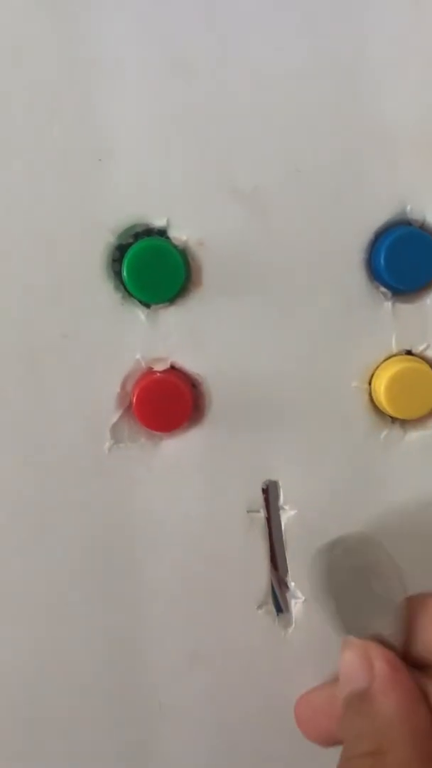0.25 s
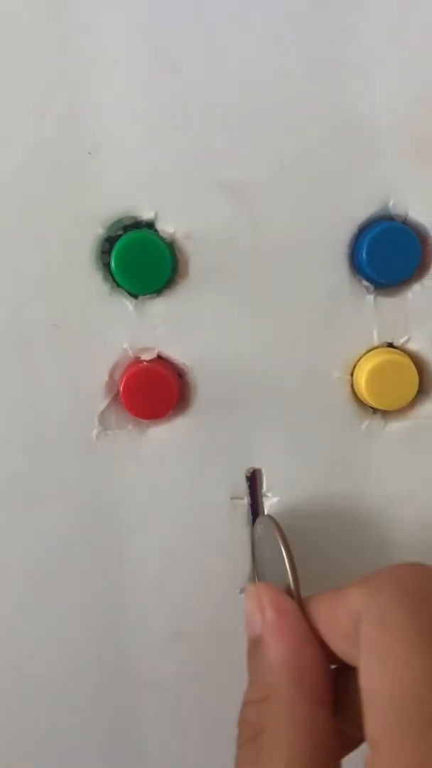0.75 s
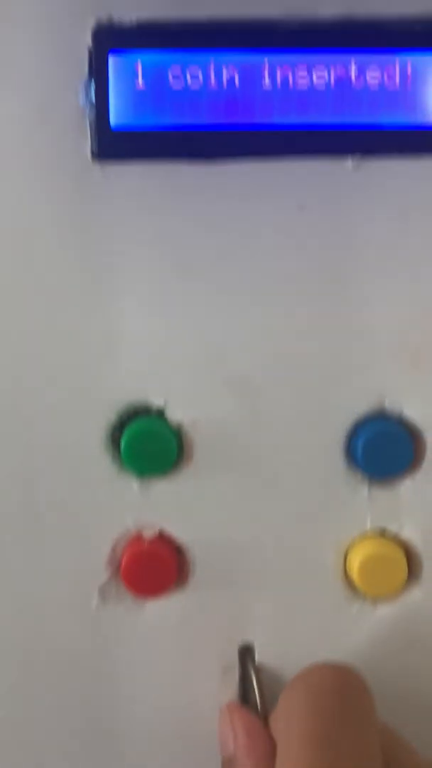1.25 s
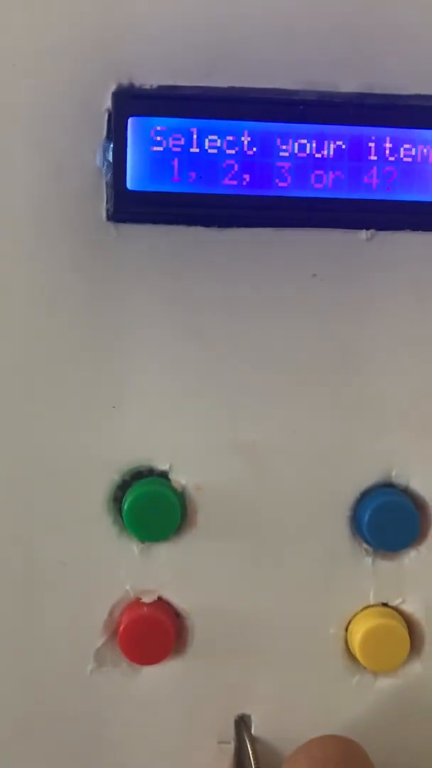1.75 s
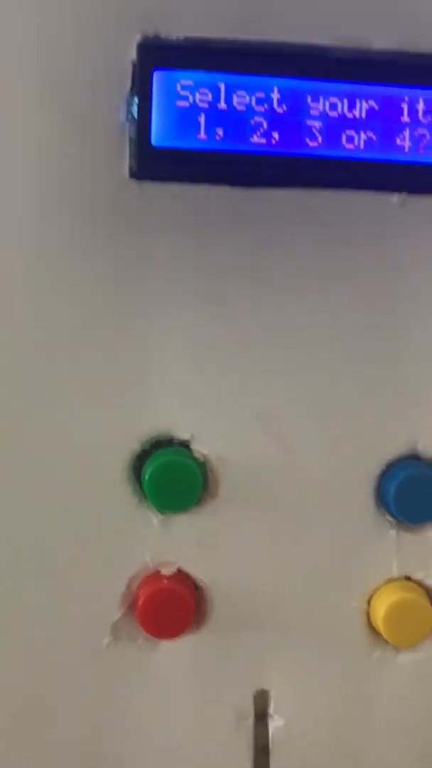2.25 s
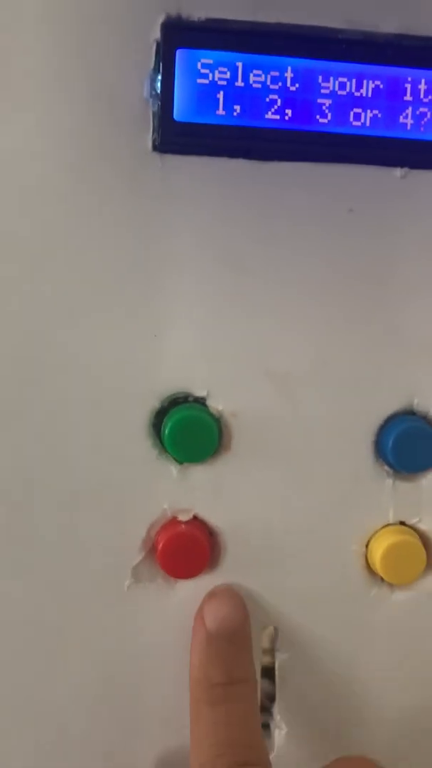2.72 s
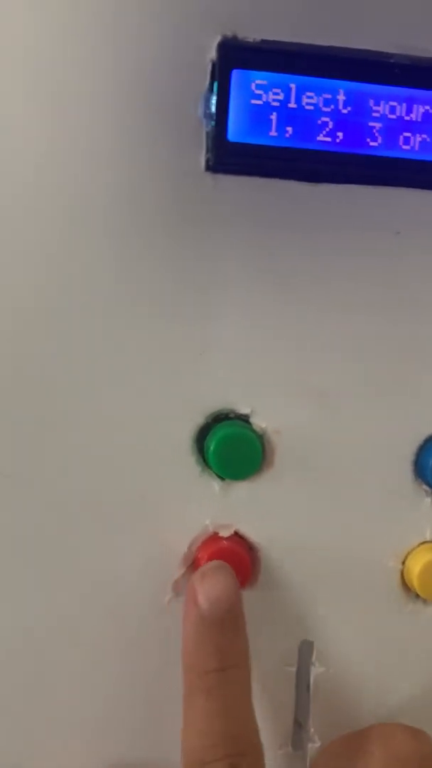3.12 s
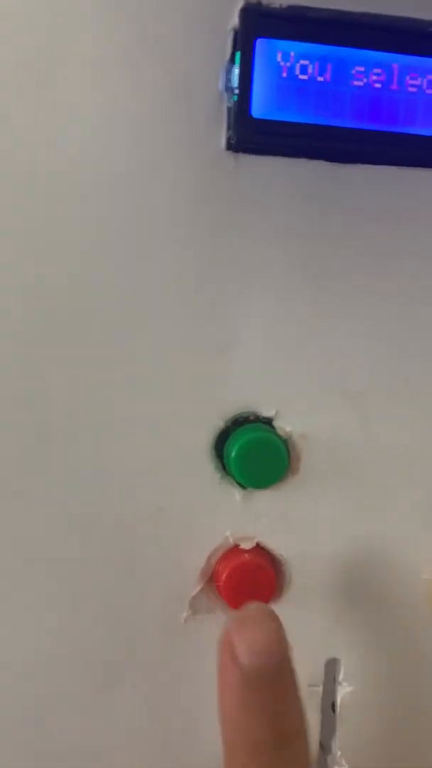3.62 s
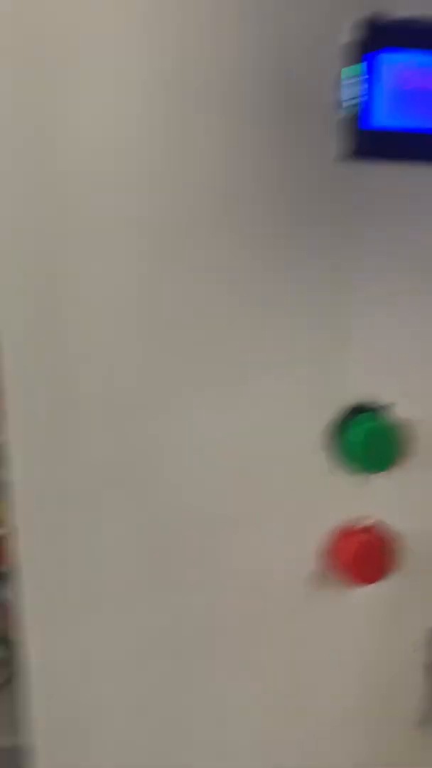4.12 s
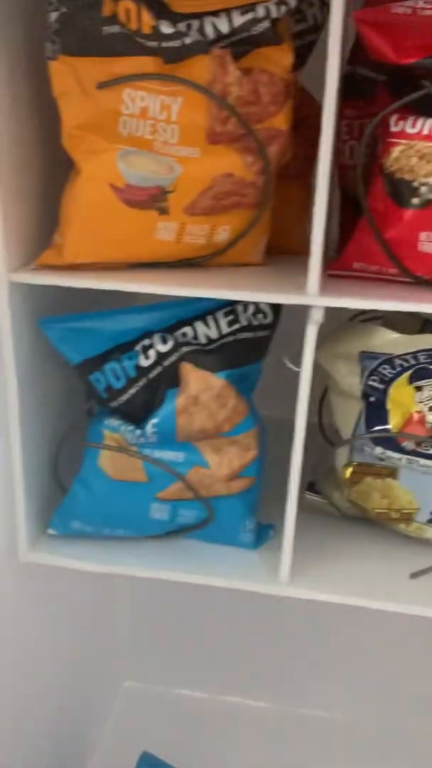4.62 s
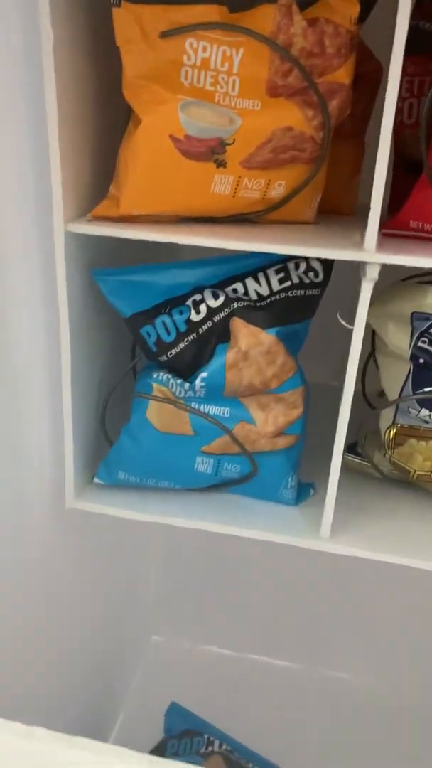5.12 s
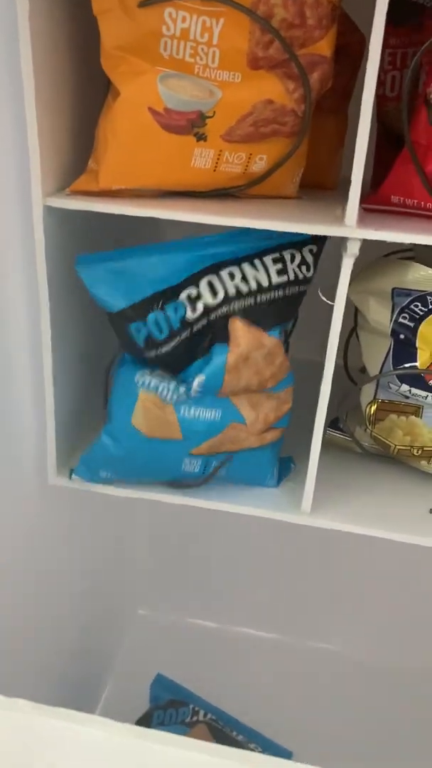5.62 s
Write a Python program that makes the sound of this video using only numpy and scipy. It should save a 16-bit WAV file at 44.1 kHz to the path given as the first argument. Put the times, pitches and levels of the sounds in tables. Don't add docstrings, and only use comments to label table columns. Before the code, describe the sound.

In a quiet room, a metal coin knocks and scrapes into a slot in a thin hollow board, ending with a bright rasp. Faint finger touches follow, then a sharp plastic button snap and a duller release knock. After a near-silent pause, a small geared motor whines in surges, rattling the cabinet while a foil snack bag cracks loudly. Close handheld stereo microphone, low room rumble.

```python
import sys
import numpy as np
from scipy import signal
from scipy.fft import rfft, irfft, next_fast_len
from scipy.io import wavfile
from scipy.ndimage import uniform_filter1d

SR = 44100
rng = np.random.default_rng(int(sys.argv[2]) if len(sys.argv) > 2 else 0)


def undo_db(level):
    steps = np.asarray(level, float) / 20
    return 10 ** steps


def wav_out(sig):
    wavfile.write(sys.argv[1], SR, np.round(np.clip(np.atleast_2d(sig).T, -1, 1) * 32767).astype(np.int16))


N = 258602


def evened(x):
    return x / np.sqrt(np.mean(x ** 2) + 1e-20)


def read(points, hz):
    f, value = np.transpose(points)
    return np.interp(np.log(hz + 1), np.log(f + 1), value)


def add(mix, s, sound):
    part = mix[round(s * SR):][:len(sound)]
    part += sound[:len(part)]


def shaped(x, gain):
    size = next_fast_len(len(x) + 4096)
    return irfft(rfft(x, size) * gain(np.fft.rfftfreq(size, 1 / SR)), size)[:len(x)]


def resonate(x, hz, width):
    turn = np.exp(2j * np.pi * np.cumsum(hz * np.ones(len(x))) / SR)
    r = np.exp(-np.pi * width / SR)
    return 2 * (turn * signal.lfilter([1 - r], [1, -r], x / turn + 1e-18)).real


def through(x, peaks):
    return evened(sum(undo_db(db) * resonate(resonate(x, hz, width), hz, width) for hz, width, db in peaks))


def unfold(rows):
    s, *columns = np.transpose(rows)
    t = np.arange(s[0], s[-1], 1 / SR)
    return s[0], [np.interp(t, s, column) for column in columns]


def humps(rows):
    t, rise_share = np.arange(N) / SR, 0.33
    return sum(undo_db(db - 20 * np.maximum(t - s, (s - t) / rise_share) / fade_s) for s, db, fade_s in rows)


def grit(count, per_s, spread_db):
    size = undo_db(spread_db * np.minimum(rng.exponential(1, count), 5)) * rng.standard_normal(count)
    return size * (rng.random(count) < per_s / SR)


def ring(modes, t, stretch, soft_s, tilt_db=0):
    luck = rng.random((len(modes), 2))
    x = np.zeros(len(t))
    for k, ((hz, db, t60), (weight, tuning)) in enumerate(zip(modes, luck)):
        level_db = db + 5 * weight + tilt_db * np.log2(hz / 1000)
        tone = np.sin(2 * np.pi * hz * (.98 + .04 * tuning) * t) * (-1) ** k
        x = x + undo_db(level_db - 60 * t / (t60 * stretch)) * tone
    x = x * (1 - np.exp(-t / soft_s))
    return x / abs(x).max()


# centre_hz, width_hz, level_db
SLOT = [(920, 510, 2), (1209, 100, 6), (1533, 470, 5.5), (2900, 1000, -4), (3675, 860, -5)]
# centre_hz, width_hz, level_db
COIN = [(5497, 1200, 1.5), (6300, 1124, 7), (8300, 1990, 2)]
# centre_hz, width_hz, level_db
RIM = [(11020, 9000, -8), (14200, 9000, 15)]
# start_s, length_s, first_pressure_db, last_pressure_db, grittiness_db
COIN_STROKES = [(.045, 0.067, -75, -81, -4), (.75, 0.052, -60.5, -54.5, -18), (.81, 0.054, -68, -59, -5),
                (.864, 0.054, -56, -49, 1), (.92, 0.096, -50.5, -63.5, -3.5), (1.02, 0.13, -63, -69, -12),
                (1.16, 0.13, -71.5, -65.5, -16.5), (1.836, .05, -61, -48, -4),
                (1.886, 0.048, -41.5, -34.5, -4.5), (1.95, 0.16, -55.5, -80, -30),
                (2.24, 0.0588, -87.5, -84, 5), (2.29, 0.11, -77, -84.5, 3), (2.728, .03, -65, -85, -8),
                (3.15, 0.024, -71, -78, -2.5)]
# start_s, length_s, first_pressure_db, last_pressure_db, grittiness_db
FINGER_STROKES = [
    (.455, 0.02, -72, -61, -13),
    (.59, 0.078, -64, -82.5, -20.5),
    (2.64, 0.01401, -66, -86, -25),
    (3.2, 0.063, -85, -67.5, -15),
    (3.29, 0.1, -47, -66.5, -24),
    (3.43, 0.0424, -56, -80, -24.5),
    (3.49, 0.038, -70.5, -64.5, 1.5),
]
# peak_s, level_db, fade_20db_s
LEANS = [(.08, -51, 0.23), (.42, -54, 0.15), (.8, -52.5, 0.08), (.91, -43, 0.25), (1.94, -35.5, .14),
         (2.31, -60, 0.05), (2.66, -48, .2), (3.29, -44, .12), (3.44, -41, 0.18), (3.54, -55, 0.07),
         (4.1, -56, 0.6)]
# centre_hz, width_hz, level_db
SWAY = [(45, 30, -6), (64.3, 30, -4), (96, 30, -8), (273, 120, -24)]


def slides():
    out = humps(LEANS) * through(rng.standard_normal(N), SWAY)
    n = SR // 5
    t = np.arange(n) / SR
    grip_s, let_go_s = 0.0033, 0.0492
    grit_growth = 0.91
    for strokes, rim_db in [(COIN_STROKES, 0), (FINGER_STROKES, -14.5)]:
        for s, length, first_db, last_db, grit_db in strokes:
            rub_db = np.interp(t, [0, length, length + let_go_s], [first_db, last_db, last_db - 42])
            rub_db = rub_db + 2 * evened(uniform_filter1d(rng.standard_normal(n), 250))
            fine_db = rub_db + grit_db + grit_growth * (rub_db - max(first_db, last_db))
            rub = undo_db(rub_db) * through(grit(n, 4000, 1.8), SLOT)
            scrape = undo_db(fine_db) * through(grit(n, 9003.7, 3.0), COIN)
            rasp = undo_db(fine_db + rim_db + 4.0) * through(grit(n, 6000, 2.87), RIM)
            touching = np.minimum(t / grip_s, 1) * (t < length + let_go_s)
            add(out, s, (rub + scrape + rasp) * touching)
    return out


# start_s, blow_db, thud_db, tick_db, hardness_db_per_octave
KNOCKS = [(0.386, -29.5, -29.5, -42, -1.8), (0.469, -48, -51, -64.5, -12), (0.569, -49.5, -76.5, -39, -2.5),
          (0.916, -31, -33, -39.5, -6), (1.011, -47, -43.5, -55, 5), (1.841, -44.5, -51, -64, 3),
          (1.938, -49, -37, -35.5, 11), (2.314, -44.5, -54, -54.5, -9.5), (2.634, -54.5, -48.5, -71, 10.5),
          (3.087, -54.5, -57, -87, 3), (3.239, -49, -58, -83, 1.5), (3.427, -28, -23, -54.5, -7.5),
          (4.439, -49.5, -53, -59.5, 16), (4.46, -60, -50, -63, 11)]
# start_s, blow_db, thud_db, tick_db, hardness_db_per_octave
CLICKS = [
    (1.887, -52, -37.5, -34, 9),
    (2.332, -69, -50.5, -59.5, 6),
    (2.734, -78, -57, -61.5, 10),
    (3.217, -59.5, -54.5, -72, 6),
    (3.276, -13, -23.5, -30.5, 0),
    (3.328, -38, -60, -75, -4.5),
    (3.524, -41.5, -55, -70, 7),
]
# start_s, blow_db, thud_db, tick_db, hardness_db_per_octave
TICKS = [
    (0.052, -40, -41.5, -64, -5),
    (1.058, -54.5, -51.5, -61, 3),
    (1.175, -57.5, -55, -70, 3),
    (2.19, -73, -67.5, -69, 11.5),
    (3.43, -70, -70, -56.5, -2.5),
    (4.091, -71, -59.5, -92, 12),
]
# pitch_hz, level_db, t60_s
BOARD = [(490, -3, .07), (541.7, 0, 0.031), (732, 1.5, 0.04), (814, -4.5, 0.038), (969.5, 3, 0.022),
         (1347.7, -5, 0.026), (1540, -5.5, .04), (1817, -10.5, 0.033), (2270, -13, 0.026),
         (3000, -30, 0.01)]
# pitch_hz, level_db, t60_s
CABINET = [(59.5, -5, 0.17), (93.547, -8, 0.11), (160, -5.5, 0.15), (264, 1, 0.095), (400, 1, .05)]


def knocks():
    out, t, stretch = np.zeros(N), np.arange(SR // 4) / SR, 0.86
    for blows, tick_hz in [(KNOCKS, 3000), (CLICKS, 6300), (TICKS, 11800)]:
        for s, blow_db, thud_db, tick_db, hard_db in blows:
            noise = rng.standard_normal(len(t))
            tick = shaped(noise, lambda f: f / tick_hz / (1 + (f / (1.41 * tick_hz)) ** 4.3))
            tail = shaped(tick, lambda f: 1 / (1 + (f / 6000) ** 4))
            tick = undo_db(-60 * t / (0.027 * stretch)) * evened(tick)
            tick = tick + undo_db(-15.5 - 60 * t / 0.1387) * evened(tail)
            tick = undo_db(tick_db + 2.0) * tick * (1 - np.exp(-t / 0.0011))
            body = undo_db(blow_db) * ring(BOARD, t, 1.32 * stretch, 0.00051, hard_db)
            thud = undo_db(thud_db) * ring(CABINET, t, stretch, 0.0021)
            add(out, s, tick + body + thud)
    return out


def creep():
    out, t = np.zeros(N), np.arange(SR // 60) / SR
    for s, blow_db, *_ in KNOCKS + CLICKS + TICKS:
        scratch = through(rng.standard_normal(len(t)), SLOT + COIN)
        add(out, s - t[-1], undo_db(blow_db - 26.5 - 4200 * (t[-1] - t)) * scratch)
    return out


# start_s, pitch_hz, peak_db, t60_s
PANEL_TONES = [(.39, 251, -27, 0.15), (0.387, 1380, -42.5, 0.056), (1.94, 56, -33, .3),
               (3.277, 972, -19, 0.025), (3.28, 400, -21.5, 0.041), (3.43, 343.6, -24.5, 0.037),
               (5.596, 1630, -20, 0.035), (5.622, 944, -21.5, 0.041), (5.649, 580, -18.5, 0.047),
               (5.655, 160.3, -23, 0.11), (5.68, 225, -26, 0.13), (5.791, 92, -29, 0.34),
               (5.765, 490, -31.5, 0.088)]


def drum():
    out, t = np.zeros(N), np.arange(SR // 4) / SR
    for s, hz, db, t60 in PANEL_TONES:
        add(out, s, undo_db(db) * ring([(hz, 0, t60)], t, 0.77, .0015))
    return out


# time_s, pitch_hz, level_db
SQUEAK = [(2.26, 2680, -72), (2.28, 2760, -87), (2.3, 3000, -57.5), (2.33, 3250, -83)]


def squeak():
    out = np.zeros(N)
    s, (hz, db) = unfold(SQUEAK)
    add(out, s, undo_db(db) * evened(resonate(rng.standard_normal(len(hz)), hz, 150)))
    return out


# start_s, level_db
DOME_SNAPS = [
    (3.275, -23.5),
    (3.328, -69),
    (3.43, -70),
]
# pitch_hz, level_db, t60_s
DOME = [(3750, 0, .06), (5160, 2, 0.14), (5970, 4, 0.039), (7760, -9, 0.0686), (9520, -11.5, 0.13),
        (13500, -11.5, .04)]


def switch():
    out, t = np.zeros(N), np.arange(SR // 4) / SR
    for s, db in DOME_SNAPS:
        add(out, s, undo_db(db) * ring(DOME, t, 0.43, 0.00057))
    return out


# time_s, pitch_hz
SURGES = [
    [(5.335, 1700), (5.365, 2270), (5.4, 2310), (5.415, 2850), (5.44, 3300), (5.47, 2900), (5.52, 2860),
     (5.565, 2280)],
    [(5.6, 2420), (5.64, 2790), (5.66, 3050), (5.7, 3080), (5.73, 2810), (5.748, 2050)],
    [(5.785, 1900), (5.8, 2200), (5.815, 2755), (5.864, 2850)],
]


def gear_whine():
    out = np.zeros(N)
    s, (hz,) = unfold(np.concatenate(SURGES))
    n = len(hz)
    sing_hz, sing_width_hz, spin_up_s, teeth_per_turn = 2770, 283, .018, 5.8
    start = np.minimum(np.arange(n) / SR / spin_up_s, 1) ** 2
    first_db = -30.5 - 20 * np.log10(1 + ((hz - sing_hz) / sing_width_hz) ** 2)
    second_db = -41.5 - 5.5 * (hz - sing_hz) / 1000
    wobble = evened(uniform_filter1d(rng.standard_normal(n), 90))
    turns = np.cumsum(hz * (1 + 0.0261 * wobble)) / SR
    throb = 1 + .5 * np.cos(2 * np.pi * turns / teeth_per_turn)
    for k, db in enumerate([first_db, second_db, second_db - 3.5, second_db - 6.5], 1):
        flutter = undo_db(4.15 * evened(uniform_filter1d(rng.standard_normal(n), 400)))
        add(out, s, undo_db(db + 4.0) * start * flutter * throb * np.cos(2 * np.pi * k * turns))
    return out


# time_s, level_db
LOAD = [(5.325, -100), (5.345, -44.5), (5.4, -34.5), (5.57, -35.5), (5.625, -28.5), (5.66, -34),
        (5.745, -36), (5.82, -37), (5.864, -31.5)]
# frequency_hz, level_db_per_hz
RATTLE = [(500, -15.5), (1000, -6), (1700, -2.5), (2300, -4.5), (4000, -4), (7000, -3), (10000, -6),
          (13000, -9.5), (16000, -12)]
# centre_hz, width_hz, level_db
HOUSING = [(1720, 170.4, -12), (2846, 150, 5), (3950, 510, 0)]


def tooth_rattle():
    out = np.zeros(N)
    s, (effort_db,) = unfold(LOAD)
    n = len(effort_db)
    rattle = evened(shaped(grit(n, 12000, 1.2), lambda f: undo_db(read(RATTLE, f))))
    rattle = rattle + undo_db(-13.5) * through(rattle, HOUSING)
    uneven = undo_db(2.3 * evened(uniform_filter1d(rng.standard_normal(n), 180)))
    add(out, s, undo_db(effort_db + 4.0) * rattle * uneven)
    return out


# peak_s, level_db, fade_20db_s
LURCHES = [
    (5.39, -36.5, 0.09),
    (5.48, -33, .2),
    (5.59, -36, 0.12),
    (5.655, -31, 0.13),
    (5.77, -32, 0.11),
    (5.84, -28.5, 0.09),
]
# centre_hz, width_hz, level_db
BUZZ = [(92, 43, -7), (146.4, 78, -3), (225, 54, -2), (400, 95, -5.5), (490, 61, -2), (580, 63, -1.5)]


def cabinet_buzz():
    running = np.arange(N) > LOAD[0][0] * SR
    return humps(LURCHES) * running * through(grit(N, 700, 4.42), BUZZ)


# start_s, snap_db, centre_hz, dull_db
SNAPS = [(5.4139, -19, 6480, -26.5), (5.4622, -16, 6300, -28), (5.491, -8.5, 5530, -29),
         (5.5211, -20, 5600, -20), (5.5634, -20, 6740, -35), (5.5783, -5, 6380, -25),
         (5.583, -10, 7700, -27), (5.5937, -10, 6500, -16), (5.6049, -7.5, 5400, -31),
         (5.6175, -32, 6850, -22.5), (5.62, -9, 6300, -32), (5.624, -16.5, 6650, -18.5),
         (5.6488, -13, 5880, -13), (5.6897, -6.5, 3880, -22), (5.7669, -8, 3930, -24.5),
         (5.7745, -12, 7550, -37), (5.8186, -31, 5730, -23.5), (5.835, -21, 7440, -26.5),
         (5.8502, -15, 6830, -24.5)]


def snaps():
    out, t = np.zeros(N), np.arange(SR // 10) / SR
    rise = 1 - np.exp(-t / 0.00067)
    fall_db, flip_db = -60 * t / .014, 3 - 60 * t / 0.0036
    for s, snap_db, hz, dull_db in SNAPS:
        noise = rng.standard_normal((2, len(t)))
        crack = 1.26 * noise[0] + through(noise[0], [(hz, 1400, 0), (10460, 2600, -11)])
        crack = undo_db(snap_db - 7.5) * (undo_db(fall_db) + undo_db(flip_db)) * crack
        flap = through(noise[1], [(580, 360, -8.5), (996, 227, -3), (1700, 930, -6.5)])
        flap = undo_db(dull_db + 0.54 * fall_db) * flap
        add(out, s, rise * (crack + flap))
    return out


# frequency_hz, t60_s
ROOM = [(100, 0.2998), (500, .3), (2000, 0.042), (8000, 0.16), (16000, 0.098)]


def room(x):
    count = SR // 2
    taps = rng.choice([-1., 1.], count) * (rng.random(count) < .05) * (np.arange(count) > 200)
    hz, t, z = signal.stft(taps, SR, nperseg=256)
    tail = signal.istft(z * undo_db(-60 * t / read(ROOM, hz)[:, None]), SR, nperseg=256)[1]
    return signal.fftconvolve(x, tail / np.linalg.norm(tail))[:N]


# frequency_hz, level_db_per_hz
AIR = [(18, -36), (30, -1.5), (124, -4), (152, -20.5), (186, -5.5), (293, -12), (349, -7.5), (377, -14.5),
       (407, -17), (785, -37), (3240, -42), (4280, -44.5), (12700, -47), (16500, -86), (22000, -120)]


def air():
    frames, hz = N // 256 + 5, np.fft.rfftfreq(1024, 1 / SR)
    a, b, patches = rng.standard_normal((frames, 513, 3)).T
    patches = evened(uniform_filter1d(uniform_filter1d(patches, 4, 0), 16, 1))
    z = (a + 1j * b) * undo_db(read(AIR, hz)[:, None] + 0.53 * patches)
    return undo_db(-59) * evened(signal.istft(z, nperseg=1024, noverlap=768)[1][:N])


# centre_hz, width_hz, level_db
FAINT = [(1240, 82, 0), (3260, 108, 0)]


def whistle():
    return undo_db(-92.5) * through(rng.standard_normal(N), FAINT)


# frequency_hz, phase_rad
PORT_TURN = [(1500, 5.075), (2300, 1.8), (3300, 3.42), (5000, 3.596), (16000, 2.9096)]
# frequency_hz, likeness_0_to_1
PORT_SAME = [(40, 1), (300, .95), (600, 0.43), (1200, 0.44), (2200, 0.75), (5000, 0.97), (16000, 1)]


def ports(near, diffuse):
    delay_s = 10 / SR

    def half(f):
        return np.exp(.5j * np.maximum(2 * np.pi * f * delay_s - read(PORT_TURN, f), 0))

    def apart(f):
        return np.sqrt(1 - np.clip(read(PORT_SAME, f), 0, 1))

    side = shaped(diffuse, apart)
    left = shaped(near + side, half)
    right = shaped(near - side, lambda f: 1 / half(f))
    return np.array([left, right]) * undo_db([[-.3], [.3]])


def scene():
    hand = slides() + knocks() + creep() + drum() + squeak() + switch()
    near = hand + gear_whine() + tooth_rattle() + cabinet_buzz() + snaps()
    direct = near + undo_db(-15.5) * room(near) + air() + whistle()
    diffuse = undo_db(-11.0) * room(near) + undo_db(3.5) * air()
    return ports(direct, diffuse)


def band_limit(hz):
    return np.clip((15800 - hz) / 200, 0, 1) * hz ** 2 / (hz ** 2 + 23.0 ** 2)


def low_pass(x):
    return signal.sosfilt(signal.butter(12, 16790, fs=SR, output="sos"), x)


def record(dry):
    mix = np.array([shaped(side, band_limit) for side in dry])
    return low_pass(mix)


dry = scene()
out = record(dry)
wav_out(out)
```